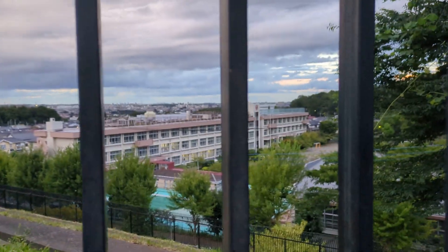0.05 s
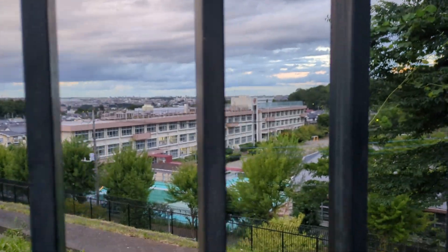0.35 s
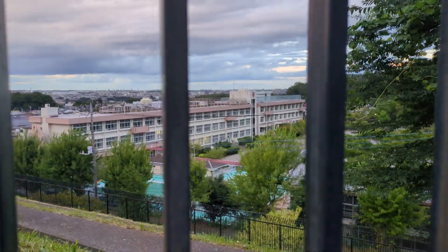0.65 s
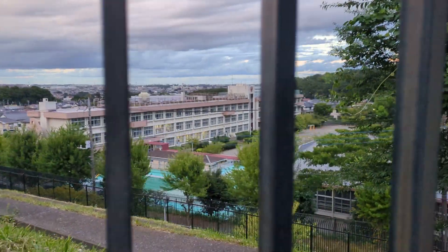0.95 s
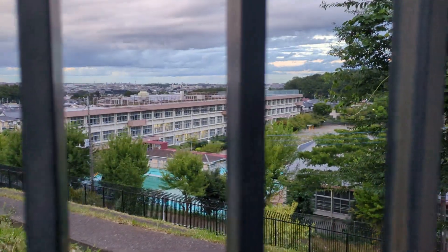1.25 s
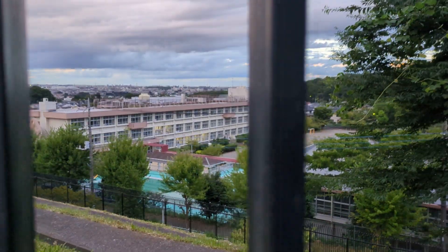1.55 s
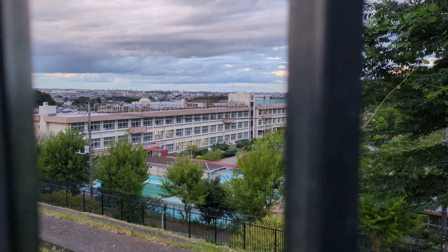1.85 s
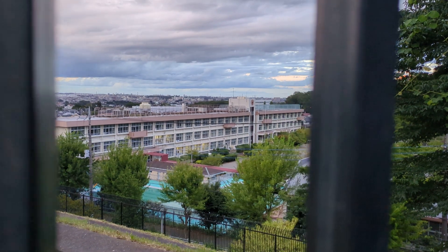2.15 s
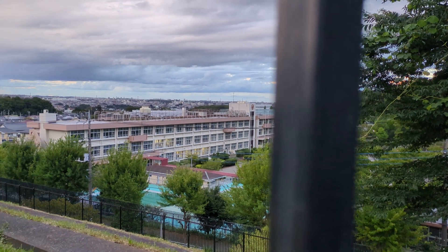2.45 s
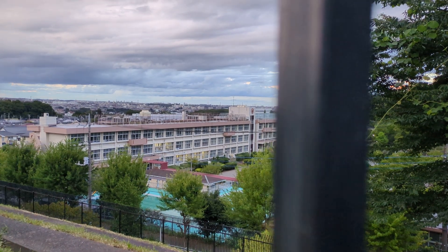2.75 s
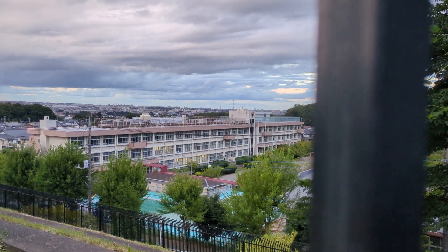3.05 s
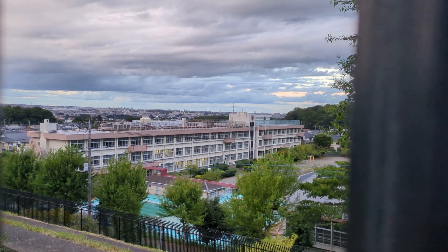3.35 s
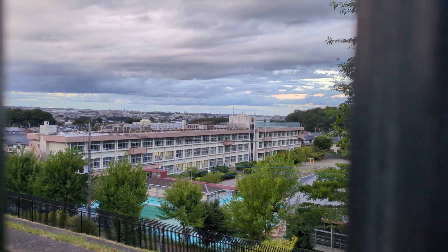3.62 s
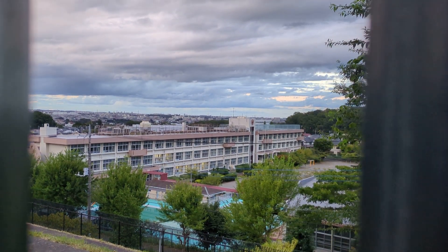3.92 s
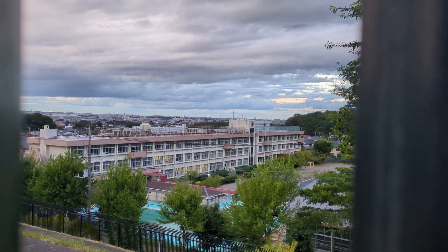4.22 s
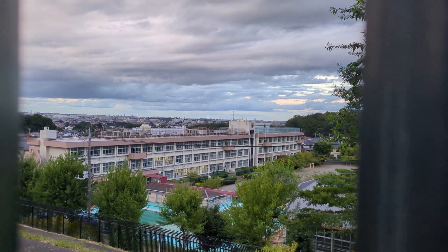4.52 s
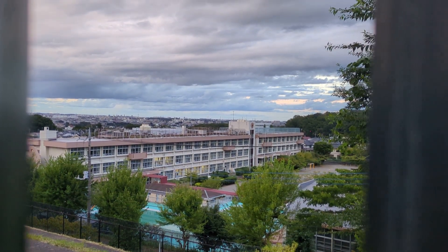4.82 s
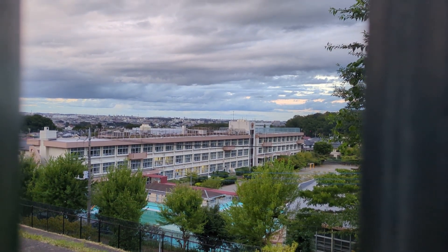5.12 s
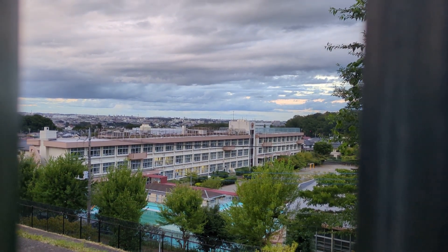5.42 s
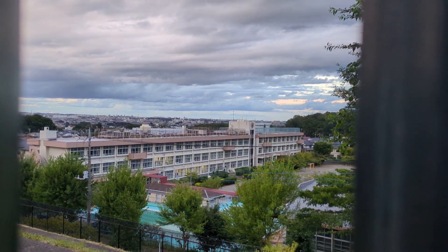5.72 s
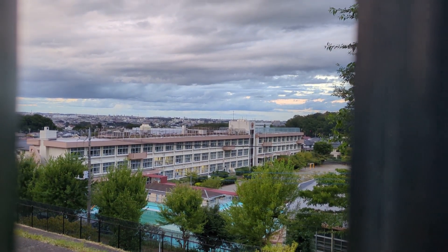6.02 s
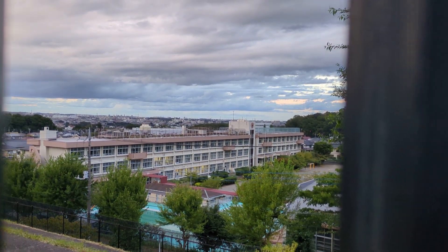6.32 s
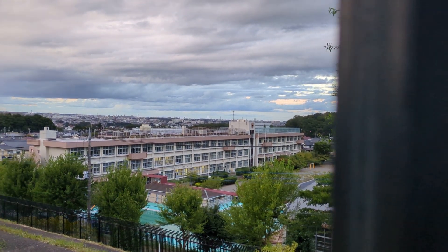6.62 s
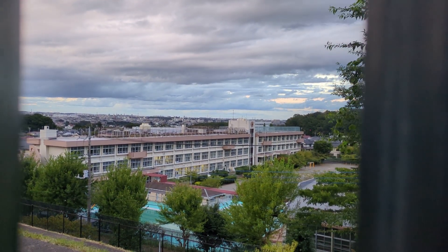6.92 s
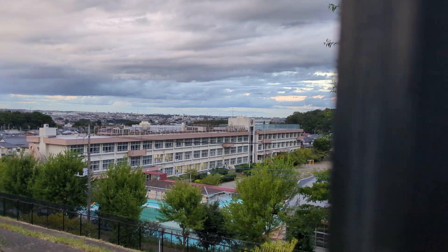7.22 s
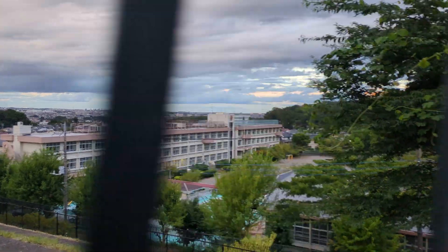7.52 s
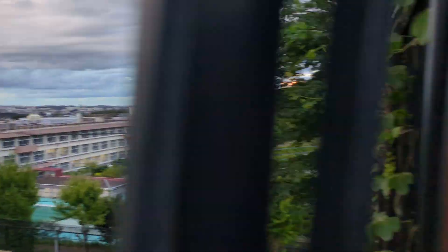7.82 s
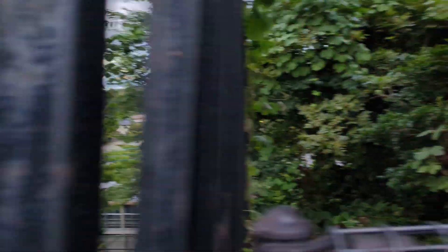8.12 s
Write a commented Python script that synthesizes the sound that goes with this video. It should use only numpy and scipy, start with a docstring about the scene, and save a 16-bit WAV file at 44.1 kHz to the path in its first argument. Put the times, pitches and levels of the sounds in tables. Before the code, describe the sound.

On a wooded hill, a faint, steady hiss of summer insects lies over the low rumble and dull thuds of a distant town. One cicada stands out, repeating short rising whistles with runs of quick ticks between them. Crickets trill, another cicada throbs and a bush cricket rasps in slow, high bursts. Close to the microphone a shoe scuffs about a second in, soft rustles come and go, and the shoe scuffs again at the end.

```python
"""A summer evening on a wooded hill. From the start a town rumbles and thuds under the hiss of far insects;
crickets trill and chirp by stridulation, a bush cricket rasps in slow bursts and a cicada throbs.
Over them the main cicada drives rising whistles with its tymbals, with runs of quick ticks between.
Near 1 s a shoe scuffs and soft rustles begin to come and go. A faint piping sounds at 4 s,
a second bush cricket buzzes at about 6.5 s, and near 8 s the shoe scuffs again."""
import sys
import numpy as np
from scipy import signal
from scipy.fft import rfft, irfft
from scipy.io import wavfile

SR = 44100
rng = np.random.default_rng(int(sys.argv[2]) if len(sys.argv) > 2 else 0)


def materialize(psi):
    """Save the field psi as 16-bit PCM at rate SR to the path in sys.argv[1].

    A 1-D psi becomes a single channel; in a 2-D psi each row is a channel.
    """
    bounded = np.clip(np.atleast_2d(psi).T, -1, 1)
    quanta = np.round(bounded * 32767).astype(np.int16)
    wavfile.write(sys.argv[1], SR, quanta)


N = 359844
T = np.arange(N) / SR
HZ = np.maximum(np.fft.rfftfreq(N, 1 / SR), 1)


def undb(db):
    """Decibels as an amplitude ratio."""
    return 10 ** (np.asarray(db) / 20)


def unit(x):
    """Normalisation to rms 1."""
    return x / np.sqrt(np.mean(x ** 2))


def curves(table):
    """Linear interpolation in time of each column after the first."""
    times, *columns = np.transpose(table)
    return [np.interp(T, times, column) for column in columns]


def noise(gain):
    """Spectral shaping: noise of rms 1 with the given relative gain at each frequency."""
    return unit(irfft(rfft(rng.standard_normal(N)) * gain, N))


def colour(points):
    """A spectral envelope through (frequency_hz, gain_db) points."""
    hz, db = np.transpose(points)
    return undb(np.interp(np.log(HZ), np.log(hz), db))


def band(hz, width_hz):
    """The band-pass response of a steep resonance."""
    return 1 / (1 + ((HZ - hz * hz / HZ) / width_hz) ** 2)


def walk(cutoff_hz):
    """Random modulation: low-pass noise of rms 1."""
    return noise(1 / (1 + (HZ / cutoff_hz) ** 4))


def tone(hz, width_hz, rough):
    """Line broadening: random modulation spreads the rough share of a tone's power into sidebands."""
    phase = 2 * np.pi * np.cumsum(hz) / SR
    rough = np.clip(rough, 0, 1)
    sidebands = walk(width_hz) * np.sin(phase) + walk(width_hz) * np.cos(phase)
    return np.sqrt(2 * (1 - rough)) * np.sin(phase) + np.sqrt(rough) * sidebands


def phrases(table):
    """Round-shouldered amplitude envelopes from (middle_s, length_s, level_db) rows."""
    return sum(undb(db) * np.exp(-np.minimum(np.abs(2 * (T - s) / length), 3) ** 4)
               for s, length, db in table)


def swell_at(peak_s, rise_s, fall_s):
    """Exponential growth to 1, then exponential decay."""
    return np.exp(-np.minimum(np.abs(T - peak_s) / np.where(T < peak_s, rise_s, fall_s), 20))


def runs(table, gap_s):
    """Periodic calls about gap_s apart within each run: yields time_s, level_db and further columns."""
    for first, last, first_db, last_db, *rest in table:
        gaps = max(round((last - first) / gap_s), 1)
        for share in np.linspace(0, 1, gaps + 1):
            yield first + share * (last - first), first_db + share * (last_db - first_db), *rest


def place(x, lag_ms, pan_db, wet_db, t60):
    """Path difference and scattering: direct sound reaches the left later; trunks and leaves add tails."""
    t = T[:SR // 2]
    direct = [np.interp(T - side * lag_ms / 2000, T, x) for side in (1, -1)]
    sway_times = np.arange(0, T[-1] + 1, 0.5)
    scatter = []
    for _ in range(2):
        tails = rng.standard_normal((3, len(t))) * undb(-60 * t / t60) * (t > 0.003)
        paths = np.array([signal.fftconvolve(x, tail / np.linalg.norm(tail))[:N] for tail in tails])
        # leaves sway, so the paths trade strength
        sway = np.array([np.interp(T, sway_times, rng.standard_normal(len(sway_times))) for _ in tails])
        scatter.append(np.sum(paths * sway, axis=0) / np.linalg.norm(sway, axis=0))
    both = unit(np.array(direct)) * np.std(x) + undb(wet_db) * np.array(scatter)
    return both * undb([[pan_db / 2], [-pan_db / 2]]) / np.hypot(1, undb(wet_db))


def diffuse(gain, spacing_ms=0.45):
    """A diffuse field: left and right are coherent in the bass and unrelated in the treble."""
    coherence = 0.985 * np.sinc(2 * HZ * spacing_ms / 1000)
    mid, side = (irfft(rfft(rng.standard_normal(N)) * gain * np.sqrt(1 + sign * coherence), N)
                 for sign in (1, -1))
    return unit(np.array([mid + side, mid - side]))


def town():
    """The town far below forms a diffuse field: two low noise bands and a broad rumble."""
    # deep drone: time_s, level_db
    drone_level = [(0, -54.5), (1.1, -51), (2.2, -52), (4.1, -53.5), (4.55, -50), (5.2, -55), (6.3, -53),
                   (7.1, -49.5), (8.16, -54.5)]
    # rumble spectrum: frequency_hz, gain_db
    spectrum = [(20, -26), (40, -16), (90, -8), (140, 0), (200, -2), (320, -11.5), (500, -14), (800, -17.5),
                (1250, -22.5), (3000, -22), (8000, -36.5)]
    # slow swell of the rumble: time_s, level_db
    rumble_level = [(0, -53.5), (1.2, -53.5), (2.2, -53.5), (4.5, -54), (6, -53), (8.16, -51.5)]
    drone = diffuse(band(65.6, 23), spacing_ms=0.32) * undb(curves(drone_level)[0])
    boom = diffuse(band(99.8, 33), spacing_ms=0.34) * undb(-55)
    rumble = diffuse(colour(spectrum), spacing_ms=0.56) * undb(curves(rumble_level)[0] + 0.9 * walk(4))
    return drone + boom + rumble


def far_chorus():
    """Countless far insects sum incoherently into a hiss, with a thin ring of crickets in it."""
    # hiss spectrum: frequency_hz, gain_db
    spectrum = [(1300, -60), (1850, 2.5), (2400, -6), (3100, -15), (4200, -10.5), (5100, 2), (5550, 3),
                (6100, 3), (7600, 4), (9000, 4.5), (9900, 3), (12200, 2.5), (13500, 1.5), (15800, -2.5)]
    hiss = diffuse(colour(spectrum)) * undb(-49.5 + 0.8 * walk(9.7))
    crickets = diffuse(band(9380, 130)) * undb(-67.5)
    return hiss + crickets


def thuds():
    """Dull thuds in the rumble: a rough low tone grows and decays exponentially, alike on both sides."""
    # thuds: peak_s, decay_s, level_db
    pulses = [(.02, .12, -44), (1.05, .05, -48), (1.19, .05, -43), (1.41, 0.049, -43), (3.2, 0.14, -41),
              (3.5, 0.061, -47.5), (4.08, 0.034, -42.5), (4.29, 0.043, -40), (4.46, .04, -43.5),
              (5.36, 0.038, -43.5), (5.92, 0.15, -46), (6.45, 0.021, -38.5), (6.73, 0.12, -42),
              (7.44, 0.07, -42)]
    envelope = sum(undb(db) * swell_at(s, rise_s=0.016, fall_s=decay) for s, decay, db in pulses)
    return envelope * tone(105.2 + 5 * walk(5.9), width_hz=22.6, rough=0.38)


def far_piping():
    """A faint note from deep in the wood, where scattered sound outweighs the direct path."""
    # piping: middle_s, length_s, level_db
    notes = [(4.04, 0.1, -64)]
    piping = tone(3604 + 12 * walk(22), width_hz=34, rough=0.5) * phrases(notes)
    return place(piping, lag_ms=0, pan_db=9, wet_db=17, t60=0.43)


def rustles():
    """Soft rustles close by: broadband noise, amplitude-modulated into brief swells."""
    # rustles: middle_s, length_s, level_db
    swells = [(.99, 0.19, -52.5), (1.98, 0.26, -55), (3.25, 0.47, -59.5), (4.05, 0.1, -72),
              (8.09, 0.2, -53)]
    # rustle spectrum: frequency_hz, gain_db
    spectrum = [(900, -23), (1800, 0.5), (3400, -4.5), (5000, -9), (9000, -28)]
    rustle = noise(colour(spectrum)) * unit(undb(0.56 * walk(60))) * phrases(swells)
    return place(rustle, lag_ms=0.24, pan_db=-2, wet_db=11, t60=0.093)


def shoe():
    """Friction noise: grit crunches briefly under a sole."""
    # scuffs: peak_s, decay_s, level_db
    scuffs = [(0.894, 0.011, -48), (0.901, 0.016, -44.5), (1.092, 0.0091, -45.5), (7.897, 0.0067, -50.5),
              (8.012, .012, -52), (8.09, 0.047, -58)]
    # grit spectrum: frequency_hz, gain_db
    spectrum = [(200, -8), (600, -9.5), (1050, -6.5), (1700, -5), (2400, -13), (4000, -17.5), (9000, -17),
                (16000, -32)]
    envelope = sum(undb(db) * swell_at(s, rise_s=0.0049, fall_s=decay) for s, decay, db in scuffs)
    crunch = envelope * noise(colour(spectrum)) * undb(0.98 * walk(480))
    return place(crunch, lag_ms=0, pan_db=3, wet_db=-3, t60=0.87)


def bush_crickets():
    """Broadband stridulation: files of tiny teeth scrape in grainy bursts."""
    # one insect's rasps: middle_s, length_s, level_db
    bursts = [(.1, 0.58, -53), (1.21, 0.29, -47), (2.52, .28, -46), (3.75, 0.23, -49), (4.95, 0.24, -48),
              (6.12, 0.22, -49), (7.28, .26, -48)]
    # rasp spectrum: frequency_hz, gain_db
    spectrum = [(8000, -30), (9800, -10), (10800, -6), (12200, -11), (13400, -2), (14200, -2), (14900, 2),
                (15700, -2), (17000, -15)]
    # another's thin buzz: middle_s, length_s, level_db
    buzzes = [(6.58, 0.53, -50.5)]
    rasp = diffuse(colour(spectrum)) * unit(undb(1.6 * walk(380))) * phrases(bursts)
    buzz = diffuse(band(14400, 1100)) * unit(undb(2.5 * walk(200))) * phrases(buzzes)
    return rasp + buzz


def field_crickets(strokes_per_s=38, pitch_hz=5722, arch_hz=90, far_hz=5510, far_db=-62):
    """Tonal stridulation: chirps of wing strokes that arch in pitch; a lower cricket trills farther off."""
    # runs of chirps: first_s, last_s, first_db, last_db, chirp_length_s
    chirp_runs = [(.05, .56, -55.5, -51.5, 0.23), (.83, 1.26, -56.5, -55.5, 0.19),
                  (1.96, 2.82, -57.5, -58.5, 0.1), (3.33, 4.54, -60, -58, 0.18),
                  (5.0, 5.86, -61, -62, 0.092), (6.36, 6.84, -54.5, -52, .12), (7.96, 8.18, -54, -60, 0.12)]
    stroke, far_stroke = (np.sin(np.pi * (strokes_per_s * T + 0.15 * walk(4.2))) ** 2 for _ in range(2))
    hz = pitch_hz + arch_hz * (stroke - 0.83) + 12 * walk(39.6)
    song = unit(tone(hz, width_hz=30, rough=0.28) * stroke ** 0.86)
    chirps = phrases([(s, length, db) for s, db, length in runs(chirp_runs, gap_s=0.235)])
    far_tone = tone(far_hz + 50 * walk(5), width_hz=48, rough=0.3)
    far_trill = unit(far_tone * far_stroke * undb(1.8 * walk(6))) * undb(far_db)
    return place(song * chirps + far_trill, lag_ms=0.11, pan_db=-4.5, wet_db=-4.5, t60=0.17)


def ground_cricket(strokes_per_s=38.565, grip_cycles=0.13, release_cycles=0.46):
    """Stridulation: each wing stroke grips at once and slows as it closes, so its pitch falls."""
    # trill: time_s, level_db
    trill_level = [(0, -51), (.2, -53.5), (.45, -59.5), (1.15, -57.5), (1.45, -53), (2, -56), (2.8, -58.5),
                   (3.5, -62), (5, -65), (6.8, -63), (7.6, -59.5), (8.16, -54)]
    cycle = (strokes_per_s * T + 0.72) % 1 - 0.5
    hz = 9340 - 1000 * cycle - 2400 * cycle ** 2 + 45 * walk(40)
    since_grip = cycle + 0.042
    stroke = np.exp(-(since_grip / np.where(since_grip < 0, grip_cycles, release_cycles)) ** 2)
    song = unit(tone(hz, width_hz=160, rough=0.12) * stroke) * undb(curves(trill_level)[0])
    return place(song, lag_ms=0.432, pan_db=-2.5, wet_db=-12, t60=0.37)


def throbbing_cicada(tymbal_hz=176, ring_s=0.0022):
    """Impulse excitation: tymbal clicks ring a resonance and its octave, which sweep with every throb."""
    # pace of the throbbing: time_s, rate_hz
    throb_rate = [(0.0, 13.949), (1.02, 13.701), (2.04, 14.217), (3.06, 14.143), (4.08, 14.552),
                  (5.1, 14.517), (6.12, 14.603), (7.14, 14.677), (8.16, 14.558)]
    # one squeeze of the abdomen: phase_cycles, resonance_hz, resonance_gain_db, octave_gain_db
    squeeze = [(-.47, 5500, -4.5, -9), (-.39, 6200, -12, -15), (-.29, 6400, -1, 0.5), (-.17, 6780, 3.5, -7),
               (-.04, 7160, -4.5, 0), (.1, 7250, -2, -2), (.21, 6450, -1.5, -8), (.36, 5470, -3, -1)]
    # slow swell of the two bands: time_s, resonance_db, octave_db
    levels = [(0, -57, -54), (1.2, -60.5, -51), (2, -58.5, -50), (3.0, -56, -52.5), (4.25, -56.5, -50.5),
              (5.5, -58.5, -54), (6.5, -58.5, -53), (7.3, -62, -53.5), (8.16, -56, -55)]
    # body response, which colours the upper band: frequency_hz, gain_db
    body = [(5000, -25), (6550, -3), (8000, -3), (10000, -14), (12450, -14), (13100, 2), (14000, -1),
            (14900, 2), (15500, -10), (16000, -16)]
    cycle = np.cumsum(curves(throb_rate)[0]) / SR - 0.132
    phase, *columns = np.transpose(squeeze)
    hz, low_db, high_db = (np.interp(cycle, phase, column, period=1) for column in columns)
    low_level, high_level = curves(levels)
    since_click = np.cumsum(tymbal_hz * (1 + 0.025 * walk(19))) / SR % 1 / tymbal_hz
    clicks = unit(np.exp(-since_click / ring_s) + 0.21)
    sides = []
    for _ in range(2):  # the leaves scatter it, so each side gets its own grain
        resonance = tone(hz, width_hz=380, rough=0.94)
        low = unit(resonance * undb(low_db) * (clicks + 0.6)) * undb(low_level)
        octave = irfft(rfft(tone(2 * hz, width_hz=890, rough=0.95)) * colour(body), N)
        hiss = undb(6) * noise(colour(body))
        high = unit((unit(octave) + hiss) * undb(high_db)) * undb(high_level)
        sides.append(low + high * clicks)
    return np.array(sides)


def whistling_cicada(glide_s=0.034, end_s=0.023, tick_hz=2194, tick_s=0.0085, echo_s=0.1):
    """Tension tunes a resonator: the abdomen tightens ever faster, so notes linger low, then whip up."""
    # long notes: top_s, start_hz, top_hz, length_s, level_db, hoarse_share
    whistles = [(0.064, 1820, 2485, 0.052, -40, 0), (0.749, 1550, 1950, 0.11, -56.5, 0.3),
                (1.074, 2045, 2240, .12, -45.5, 0.55), (1.15, 1768, 2576, 0.17, -42, .03),
                (2.02, 1880, 1930, 0.17, -51, 0), (2.187, 1800, 2420, .14, -42, 0.1),
                (2.346, 1698, 2560, 0.16, -45.5, 0.59), (3.248, 1635, 2490, 0.16, -45, 0.01),
                (3.445, 1720, 1844, .17, -50.5, 0.38), (3.596, 1804, 2570, 0.17, -46, 0.55),
                (4.35, 1710, 2480, 0.14, -42, 0.26), (4.779, 1773, 2480, 0.2, -46, 0.29),
                (5.391, 1794, 2493, 0.25, -46.5, 0.2), (5.97, 1794, 2480, 0.17, -44.5, 0.3),
                (6.448, 1728, 2554, 0.22, -45, 0.05), (7.129, 1842, 2490, 0.21, -45, 0.36),
                (7.48, 1697, 2416, .17, -44.5, 0.21)]
    # runs of ticks: first_s, last_s, first_db, last_db
    tick_runs = [(.235, .33, -59, -61), (.443, .782, -51.5, -49.5), (1.524, 1.868, -49, -57),
                 (2.42, 2.59, -49, -59), (2.757, 2.935, -54, -46.5), (3.796, 4.06, -53, -53),
                 (4.994, 5.084, -67, -54), (6.823, 6.911, -61, -52), (7.857, 8.118, -48, -48)]
    # tymbal rasp spectrum: frequency_hz, gain_db
    rasp_spectrum = [(1300, -9.5), (1750, 9.5), (2300, 12), (3000, 9), (3800, 3), (5000, -2.5), (8000, -28)]
    lead_end_s, creep_hz_per_s, lead_hoarse_per_s = 0.095, 1000, 4.5
    song, flick_envelope = np.zeros(N), np.zeros(N)
    rasp_power = np.full(N, undb(-65) ** 2)  # the tymbals rasp faintly all along, louder around each note
    waver = 1 + 0.016 * walk(120)
    grain = (walk(224) + 1j * walk(300)) / np.sqrt(2)

    def ring(hz, hoarse, near):
        """A note and its faint octave, their lines broadened by uneven tymbal clicks."""
        hoarse = np.clip(hoarse, 0, 1)
        wave = np.exp(2j * np.pi * np.cumsum(hz * waver[near]) / SR)
        modulation = np.sqrt(1 - hoarse) + np.sqrt(hoarse) * grain[near]
        return np.imag(modulation * (wave + undb(-24) * wave ** 2))

    for top_s, start_hz, top_hz, length, db, hoarse in whistles:
        near = (T > top_s - 2 * length) & (T < top_s + 2 * end_s)
        t = T[near] - top_s
        tension = np.exp(t / glide_s)
        attack = np.exp(np.minimum(t + 0.043, 0) / (0.39 * length))
        release = np.exp(-0.66 * tension - (np.maximum(t, 0) / end_s) ** 2)
        lead_s = np.maximum(-t - lead_end_s, 0)  # a hoarse lead-in creeps up to the start pitch
        hz = start_hz + (top_hz - start_hz) * tension - creep_hz_per_s * lead_s
        song[near] += undb(db) * attack * release * ring(hz, hoarse + lead_hoarse_per_s * lead_s, near)
        # a hoarse note ends in a flick of noise
        flick_envelope[near] += undb(db + 2) * hoarse * np.exp(-((t - 0.0074) / 0.013) ** 2)
        rasp_power += (undb(db - 11.5) * swell_at(top_s - 0.036, rise_s=0.1, fall_s=0.11)) ** 2
    for middle_s, db in runs(tick_runs, gap_s=0.087):
        near = np.abs(T - middle_s) < 3 * tick_s
        t = T[near] - middle_s
        hz = tick_hz * np.exp(22 * t)  # each tick is a tiny upward sweep
        song[near] += undb(db) * np.exp(-(t / tick_s) ** 2) * ring(hz, hoarse=0.48, near=near)
    rasp = noise(colour(rasp_spectrum)) * np.sqrt(rasp_power)
    flicks = noise(band(3030, 830)) * flick_envelope
    echo = undb(-19) * np.interp(T - echo_s, T, song, left=0)  # reflection from the slope
    return place(song + echo + rasp + flicks, lag_ms=0.48, pan_db=5.5, wet_db=-1.5, t60=0.12)


def scene():
    """Superposition: the pressures of all sources add, left and right."""
    insects = whistling_cicada() + throbbing_cicada() + ground_cricket() + field_crickets() + bush_crickets()
    return insects + far_piping() + shoe() + rustles() + thuds() + town() + far_chorus()


def record(dry, low_hz=44, top_hz=15800):
    """Band limiting: two filters cut the deepest bass and the highest treble."""
    thinned = signal.sosfilt(signal.butter(4, low_hz, "high", fs=SR, output="sos"), dry)
    return signal.sosfilt(signal.ellip(12, 0.1, 70, top_hz, fs=SR, output="sos"), thinned)


dry = scene()
out = record(dry)
materialize(out)
```